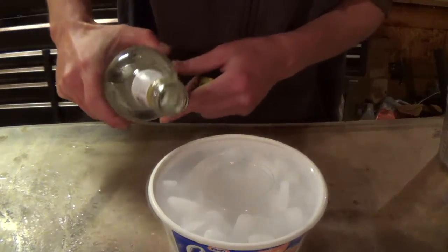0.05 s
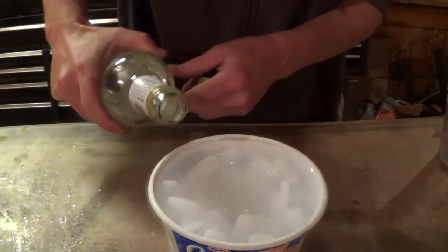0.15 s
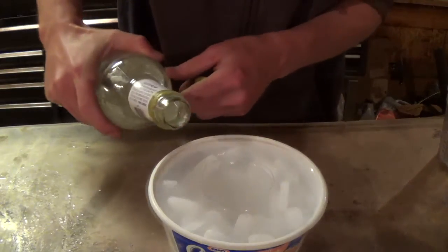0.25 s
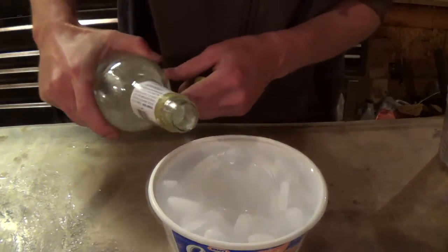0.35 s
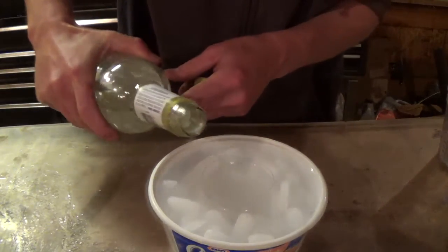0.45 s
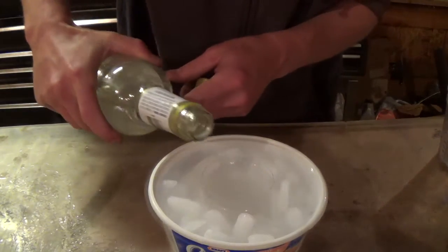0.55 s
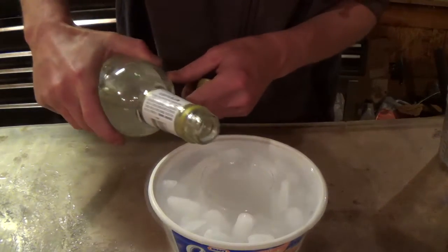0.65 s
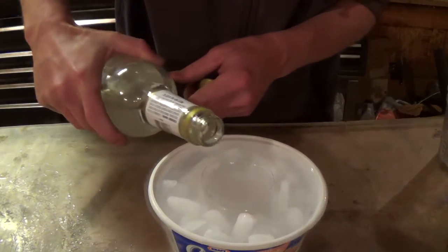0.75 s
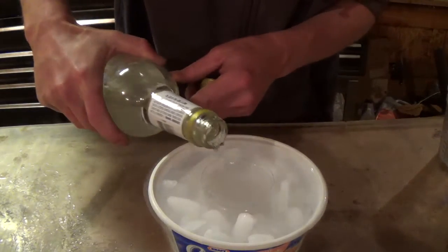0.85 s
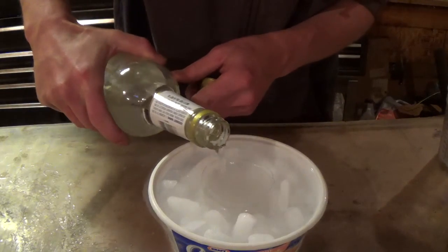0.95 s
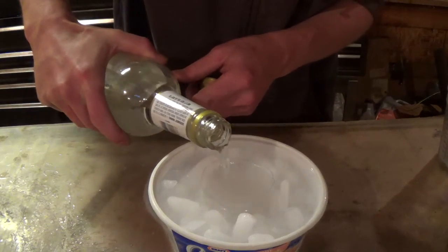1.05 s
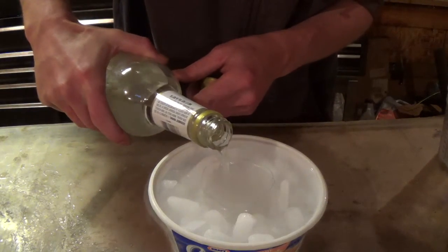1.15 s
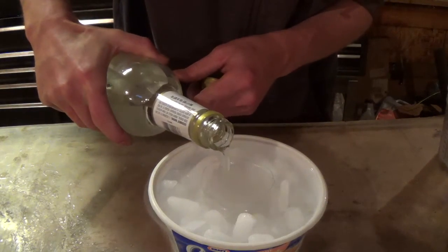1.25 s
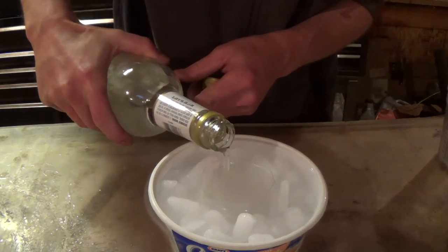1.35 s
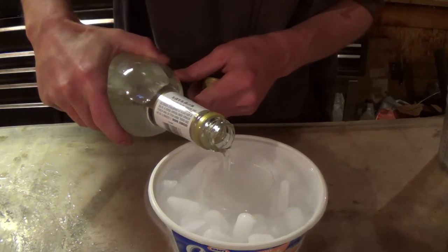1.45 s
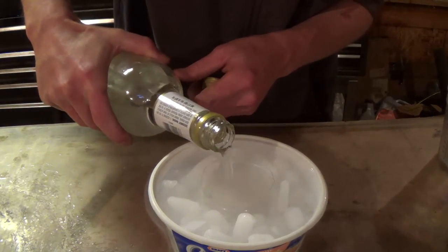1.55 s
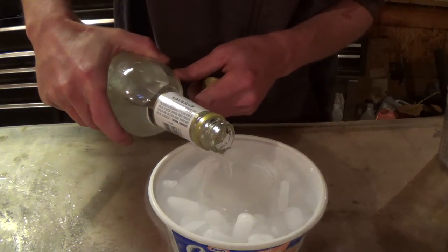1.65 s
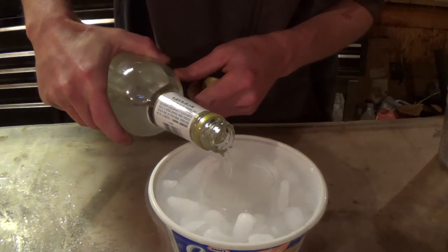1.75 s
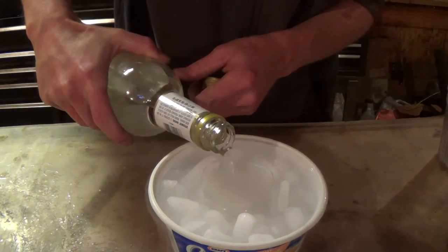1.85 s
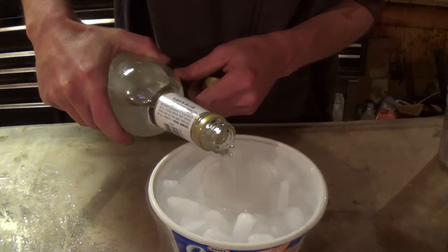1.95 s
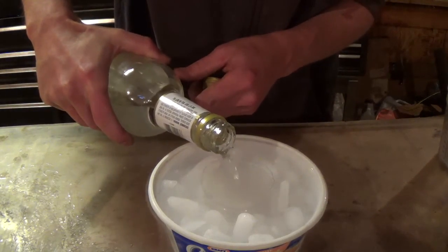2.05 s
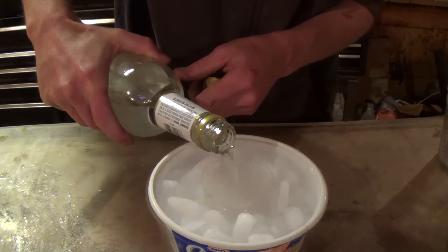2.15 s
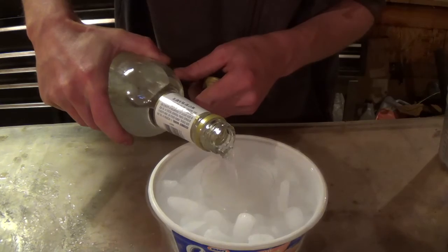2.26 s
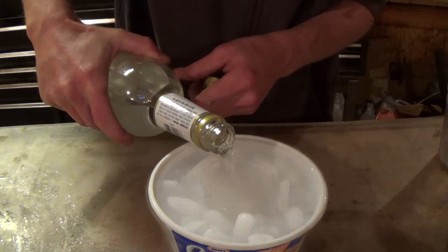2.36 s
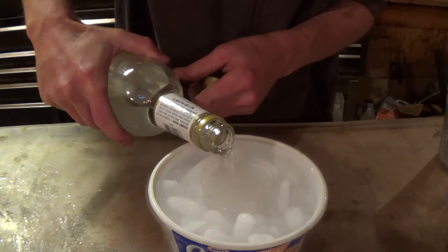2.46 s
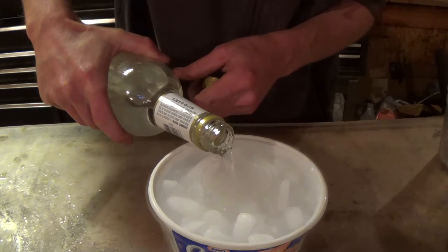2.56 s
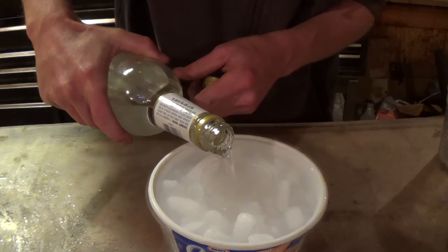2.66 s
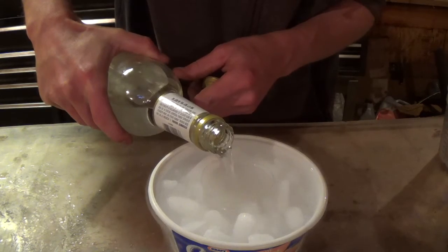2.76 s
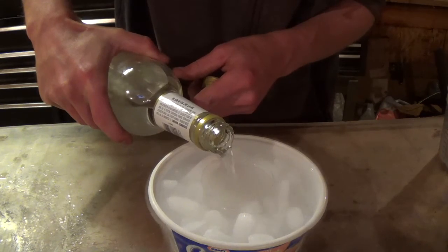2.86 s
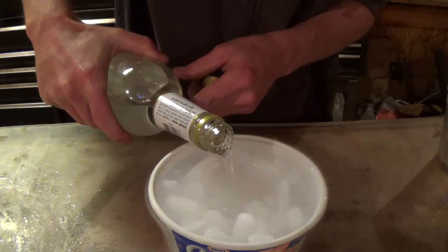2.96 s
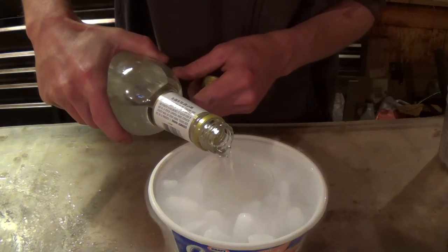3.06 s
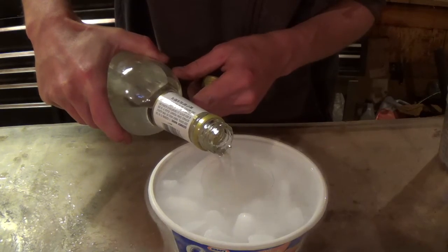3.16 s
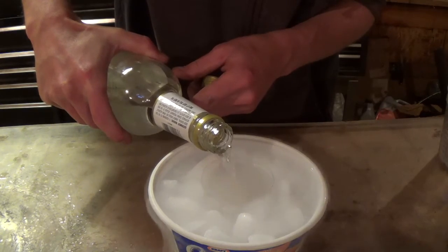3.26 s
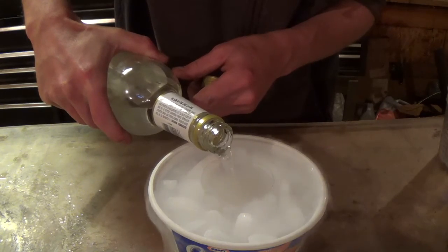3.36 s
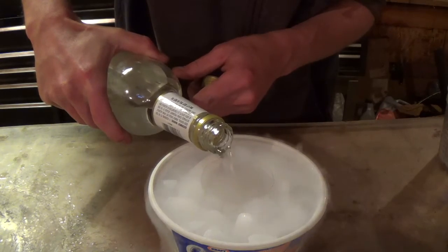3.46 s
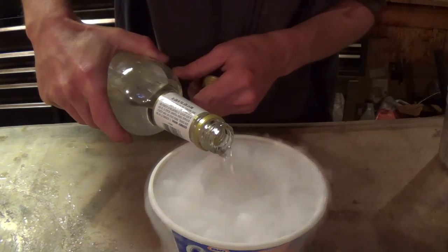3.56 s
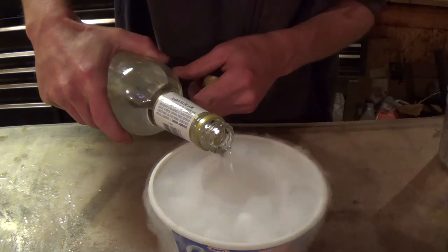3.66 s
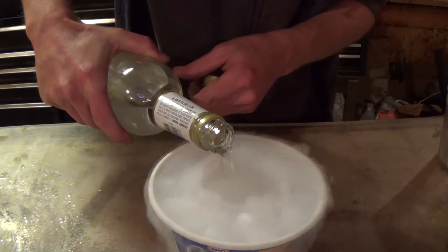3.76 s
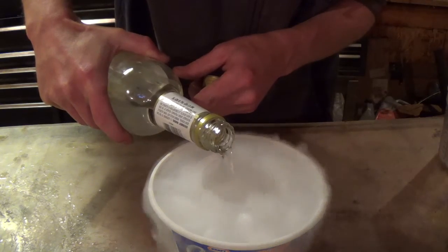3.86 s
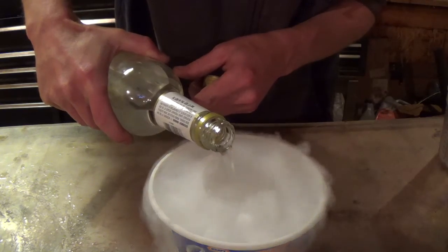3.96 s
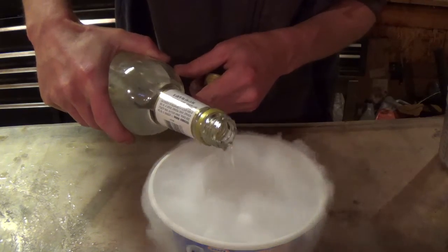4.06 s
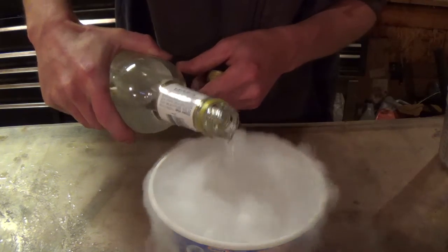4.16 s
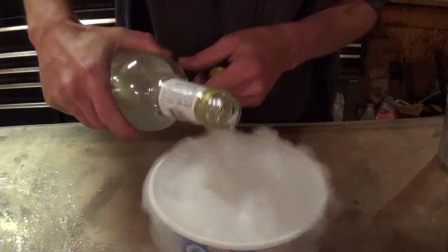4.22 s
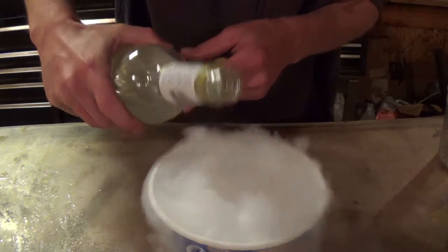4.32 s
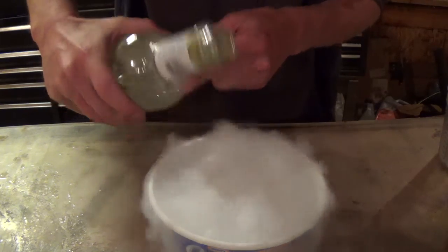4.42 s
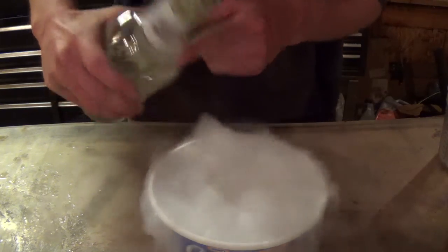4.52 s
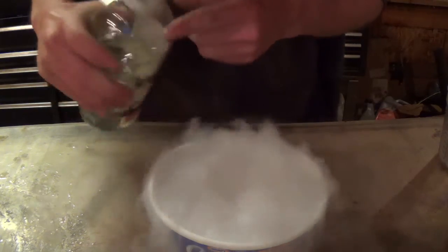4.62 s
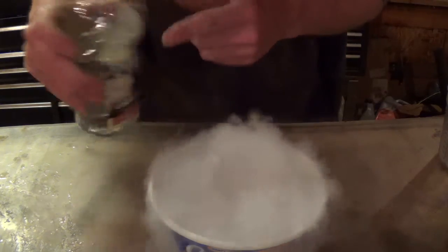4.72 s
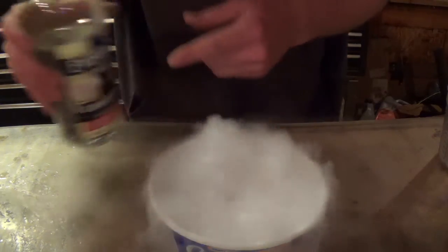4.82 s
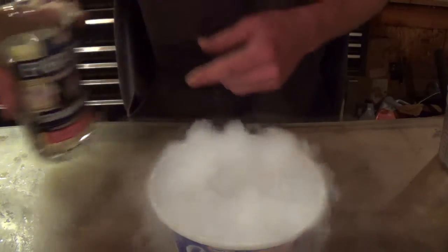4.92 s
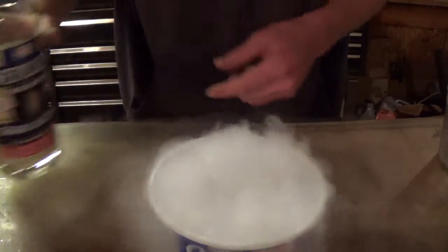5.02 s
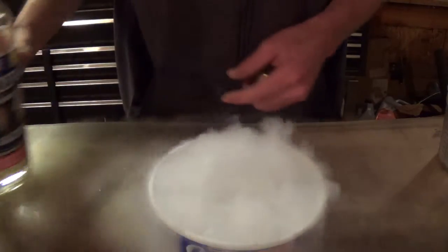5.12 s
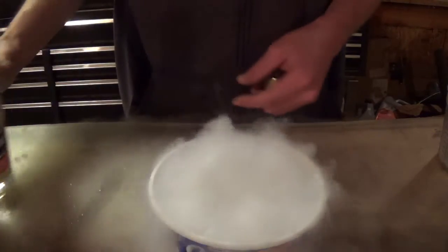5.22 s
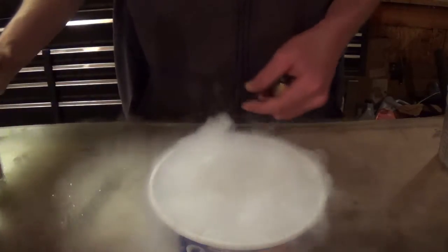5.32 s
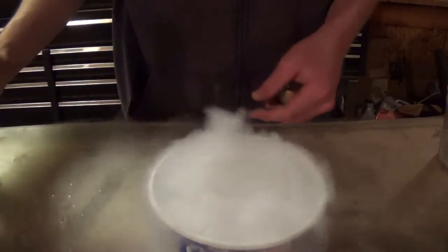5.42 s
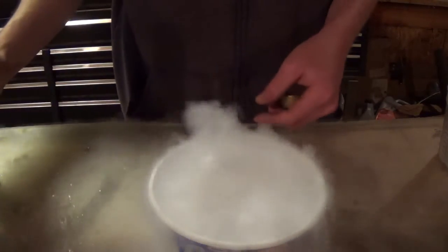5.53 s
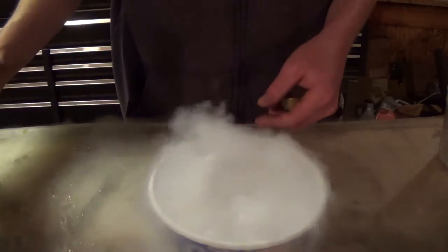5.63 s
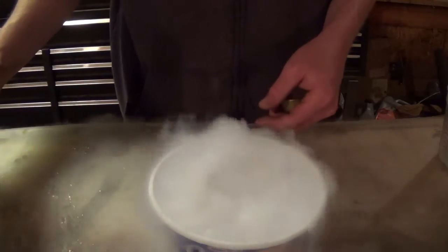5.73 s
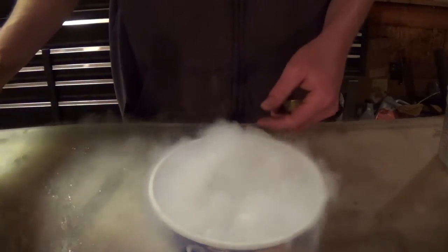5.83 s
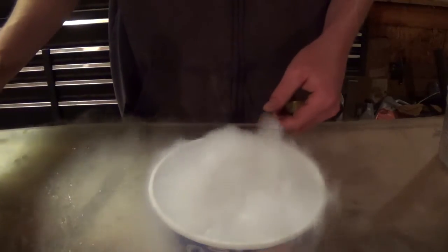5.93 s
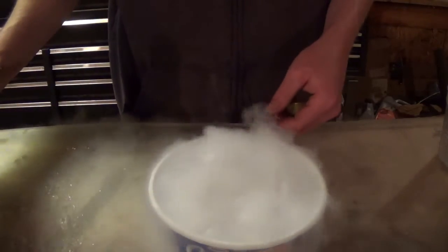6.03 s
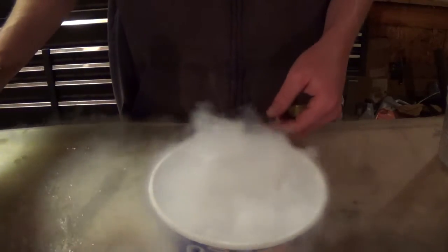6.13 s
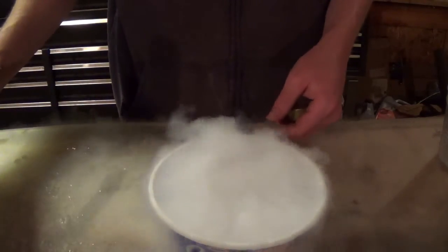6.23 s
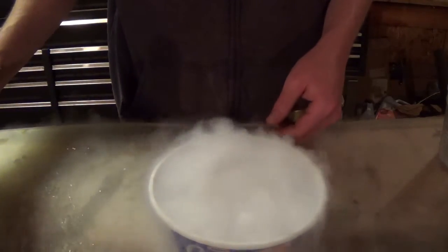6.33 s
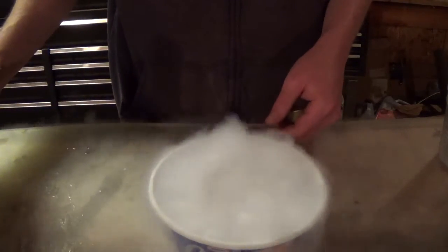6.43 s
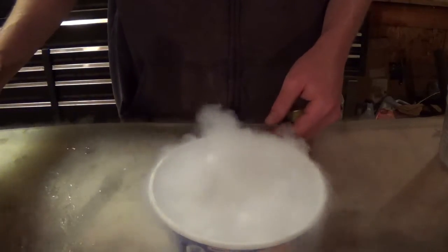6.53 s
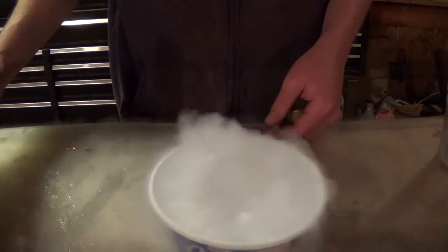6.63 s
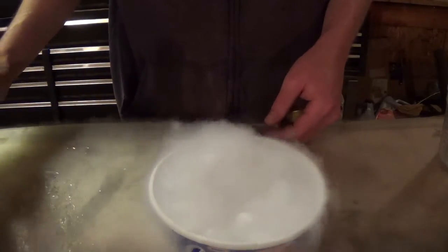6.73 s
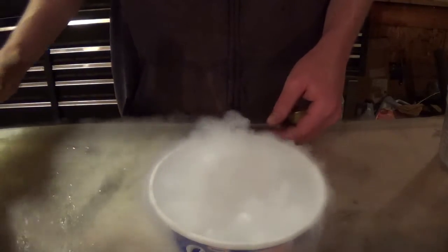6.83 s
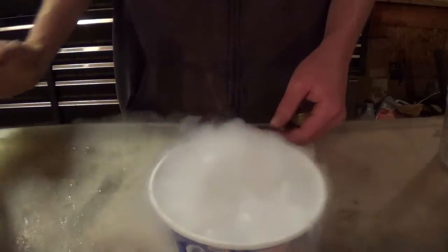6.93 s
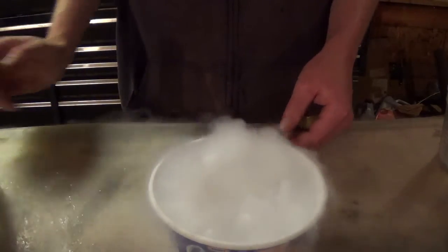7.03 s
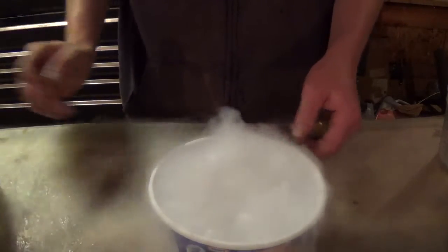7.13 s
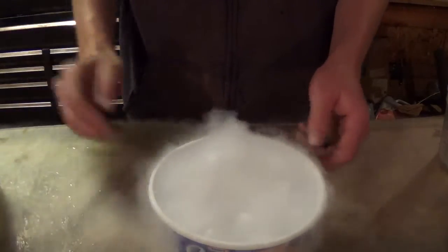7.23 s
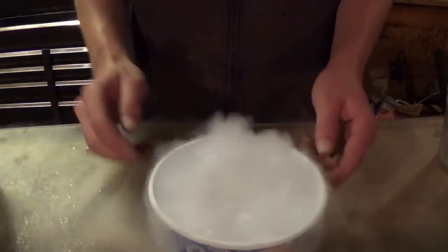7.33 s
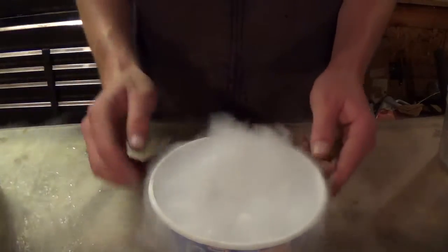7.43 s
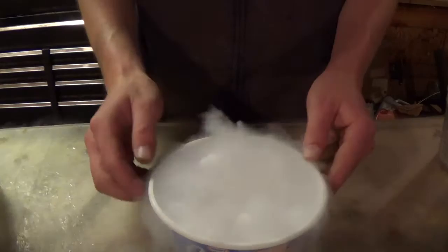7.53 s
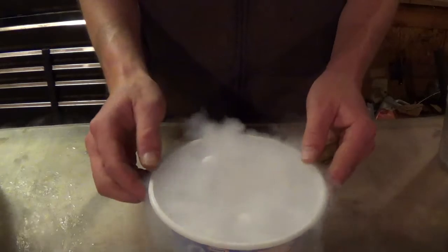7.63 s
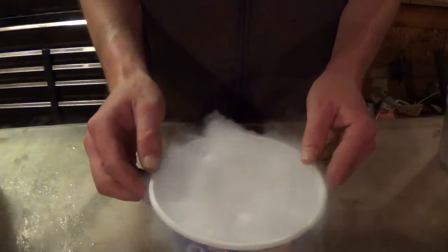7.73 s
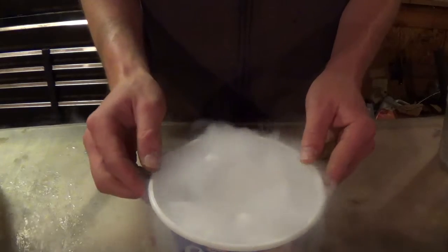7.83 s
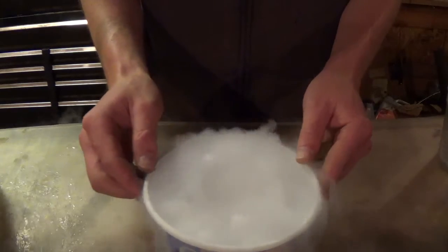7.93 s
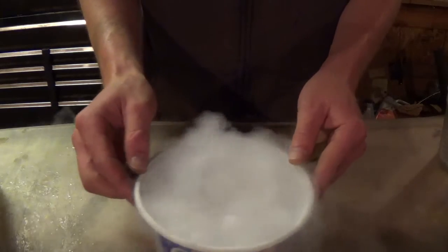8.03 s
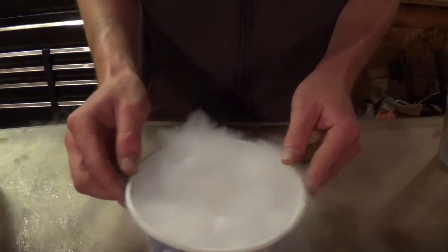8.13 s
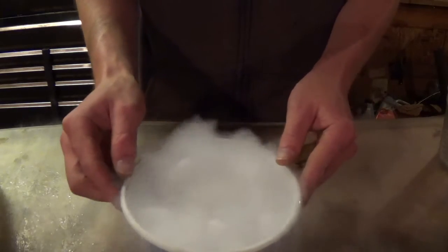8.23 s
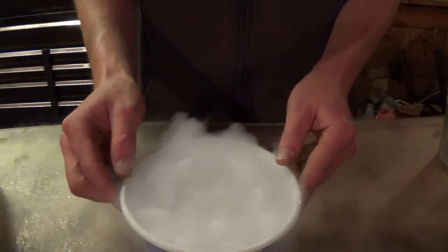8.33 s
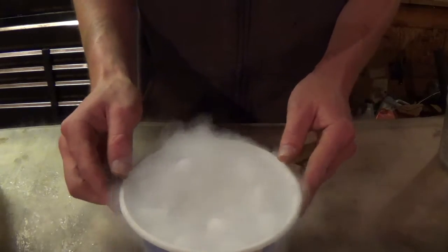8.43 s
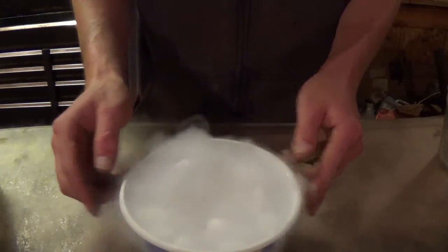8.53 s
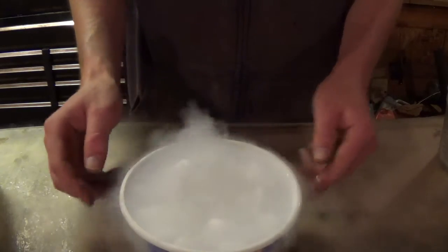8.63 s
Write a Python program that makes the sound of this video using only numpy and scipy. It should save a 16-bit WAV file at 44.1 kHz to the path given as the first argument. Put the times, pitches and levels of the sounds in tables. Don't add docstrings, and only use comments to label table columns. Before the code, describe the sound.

A small stereo microphone sits near a tub of dry ice in a quiet, slightly reverberant workshop. A faint hiss gives way to drips and crackles, then a swelling boil with hollow gurgling and bursting bubbles. The tub is knocked, later the bottle clunks onto the bench and shifts. Full, smooth fizz continues to the end with clicks, scrapes and one bright snap.

```python
import sys
import numpy as np
from scipy import signal
from scipy.fft import rfft, irfft, next_fast_len
from scipy.io import wavfile
from scipy.ndimage import map_coordinates

SR = 44100
rng = np.random.default_rng(int(sys.argv[2]) if len(sys.argv) > 2 else 0)


def level_to_linear(level):
    exponent = np.asarray(level, float) / 20
    return 10 ** exponent


def put_to_file(sound):
    columns = np.atleast_2d(sound).T
    safe = np.clip(columns, -1, 1)
    whole_steps = np.round(safe * 32767)
    wavfile.write(sys.argv[1], SR, whole_steps.astype(np.int16))


N = 382788


def unit(x):
    return x / np.sqrt(np.mean(x ** 2) + 1e-20)


def along(points, hz):
    f, v = np.transpose(points)
    return np.interp(np.log(hz + 1), np.log(f + 1), v)


def wobble(rate):
    knots = rng.standard_normal(int(N * rate / SR) + 4)
    return map_coordinates(knots, [np.arange(N) * rate / SR])


def filtered(x, response):
    m = next_fast_len(x.shape[-1] + 8192)
    spectrum = rfft(x, m) * response(np.fft.rfftfreq(m, 1 / SR))
    return irfft(spectrum, m)[..., :x.shape[-1]]


def resonances(modes):
    def response(f):
        total = 0
        for k, (centre, width, db) in enumerate(modes):
            damping = 1j * f * width
            total = total + (-1) ** k * level_to_linear(db) * damping / (centre * centre - f * f + damping)
        return total
    return response


def sides(pan_db):
    return level_to_linear(np.array([[0.5], [-0.5]]) * pan_db)


def spread(pair, spectrum, alike):
    def mid_side(hz):
        turn = np.arccos(np.clip(along(alike, hz), -1, 1)) / 2
        return level_to_linear(along(spectrum, hz)) * [np.cos(turn), np.sin(turn)]
    mid, side = filtered(pair, mid_side)
    return unit(np.array([mid + side, mid - side]))


def placed(s, grains):
    at = (s * SR).astype(int)[:, None] + np.arange(grains.shape[1])
    return np.bincount(at.ravel(), grains.ravel(), N + SR)[:N]


def ring(s, hz, cycles, gain, rise, swell, size):
    turns = hz[:, None] * np.arange(size) / SR
    life = turns / cycles[:, None]
    envelope = np.exp(-np.log(1000) * life) * (1 - np.exp(-life / swell))
    wave = np.sin(2 * np.pi * turns * (1 + rise * life / 2))
    return placed(s, gain[:, None] * envelope * wave)


def shop():
    # f/Hz, level/dB per Hz
    air_colour = [(15, -38), (25, -17), (53, -2), (86, -12.5), (154, -9), (257, -11.5), (382, -14),
                  (860, -6.5), (965, -5), (1300, -14), (1690, -43), (2860, -120)]
    # f/Hz, level/dB per Hz
    vapour_colour = [(760, -37), (1300, -6), (1600, -4.5), (1840, -7.5), (2190, -4), (3300, -4.5),
                     (5070, -7.5), (7390, -11.5), (8370, -6.5), (11000, -4.5), (14400, -38), (22000, -120)]
    # f/Hz, likeness/1
    room_alike = [(60, 0.96), (130, 0.99), (270, 0.52), (580, 0.54), (1220, 0.47), (2600, 0.67),
                  (5530, 0.63), (11800, 0.98)]
    air = level_to_linear(-58.5) * spread(rng.standard_normal((2, N)), air_colour, room_alike)
    hiss = spread(rng.standard_normal((2, N)), vapour_colour, room_alike)
    return air + level_to_linear(-52.5 + 0.31 * wobble(6)) * hiss


def walls():
    # f/Hz, t60/s
    decay = [(60, 0.29), (400, 0.42), (1500, 0.52), (8000, 0.24)]
    hz, t, z = signal.stft(rng.standard_normal((2, SR // 2)), SR, nperseg=256)
    tail = signal.istft(z * level_to_linear(-60 * t / along(decay, hz)[:, None]), SR, nperseg=256)[1]
    tail = tail + 1.2 * tail.sum(0)
    return np.pad(tail / np.linalg.norm(tail[0]), ((0, 0), (220, 0)))


def rubs():
    # centre t/s, length/s, f/Hz, width/Hz, level/dB
    settle = [
        (5.219, .02, 1100, 1200, -43),
        (5.723, .01, 1700, 700, -33.5),
        (5.736, 0.014, 1400, 650, -35),
        (5.745, 0.013, 677, 120, -29),
        (5.76, 0.01, 169, 90, -30.5),
        (5.74, 0.024, 8900, 3100, -39),
    ]
    # centre t/s, length/s, f/Hz, width/Hz, level/dB
    grips = [(7.975, 0.018, 5800, 6000, -39), (8.065, 0.013, 5600, 5700, -35.5),
             (8.135, 0.022, 8000, 6000, -41), (8.175, .012, 8000, 5000, -41), (8.05, 0.14, 160, 100, -52),
             (1.15, .015, 2400, 3000, -50), (3.4, 0.022, 290, 72, -46), (3.45, .05, 670, 130, -47.5),
             (3.4, .015, 1600, 1200, -41), (2.3, .04, 210, 200, -59), (4.2, 0.11, 970, 500, -50)]
    strokes = [(*row, 4) for row in settle] + [(*row, 1) for row in grips]
    out = np.zeros((2, N + SR))
    t = np.arange(-SR // 4, SR // 4) / SR
    for s, length, hz, width, db, pan_db in strokes:
        roughness = level_to_linear(4.5 * rng.standard_normal(len(t) // 50)).repeat(50)
        grit = rng.standard_normal(len(t)) * roughness
        stroke = np.exp(-(t / length) ** 2)
        grit = stroke * filtered(grit, resonances([(hz, width, 0)]))
        grit = grit * np.linalg.norm(stroke) / np.linalg.norm(grit)
        out[:, round(s * SR) - SR // 4:][:, :len(t)] += sides(pan_db) * level_to_linear(db) * grit
    return out[:, :N] + level_to_linear(-10.0) * signal.fftconvolve(out, walls(), axes=1)[:, :N]


def knocks():
    # t/s, level/dB, contact/ms, boards/dB, room/dB
    blows = [
        (3.3798, -16.5, 0.66, -36, -0.5),
        (3.3922, -18.5, 0.7, -30, -8),
        (5.2489, -7.5, 0.46, 0.5, -4.5),
        (5.2523, -13, 0.54, -23, -13),
        (5.269, -25.5, 1.4, 2, -9),
        (5.6266, -27, 0.47, 1, -6),
        (5.757, -28, 0.92, -1, -8.5),
        (8.2331, -29.5, 1.24, 5.5, -10.5),
        (8.2435, -37, 3.8, -3, -15),
    ]
    # f/Hz, width/Hz, level/dB
    hollow_modes = [(630, 90, 1.6), (385, 160, -12), (1000, 210, -23), (1490, 280, -27), (2050, 600, -8)]
    # f/Hz, width/Hz, level/dB
    board_modes = [(67.4, 18, 4.5), (143, 26, 0), (220, 9.7, 8), (284.4, 15, 0.5), (394, 82, -3)]
    out = np.zeros((2, N + SR))
    t = np.arange(SR // 2) / SR
    for s, db, contact_ms, boards_db, room_db in blows:
        is_bottle = 5.2 <= s < 5.3
        if is_bottle:
            pan_db = 4
        else:
            pan_db = -3 if s < 5.2 else 2
        push = -level_to_linear(db) * np.sin(np.pi * np.minimum(t * 1000 / contact_ms, 1))
        slap = filtered(push, lambda f: (1j * f / (230 + 1j * f)) ** 3)
        hollow = 3.17 * filtered(slap, resonances(hollow_modes))
        boards = level_to_linear(boards_db + 6) * (filtered(push, resonances(board_modes)) + 0.15 * push)
        source = 0.57 * hollow + boards + 1.14 * slap
        wet = signal.fftconvolve(source[None], walls(), axes=1)[:, :len(t)]
        wet = filtered(wet, lambda f: 1 / (1 + 1j * f / 1300))
        near = hollow + 0.43 * slap
        lag = 3 if is_bottle else 0
        near = np.array([near, np.roll(near, lag)])
        out[:, round(s * SR):][:, :len(t)] += sides(pan_db) * near + boards + level_to_linear(room_db) * wet
    return out[:, :N]


def rattled(x, echo_db, t60):
    t = np.arange(SR // 20) / SR
    echo = rng.standard_normal(len(t)) + 0.52 * rng.standard_normal((2, len(t)))
    echo = echo * level_to_linear(-60 * t / t60)
    return x + level_to_linear(echo_db) * signal.fftconvolve(x[None], echo / np.linalg.norm(echo[0]), axes=1)[:, :N]


def spray(count):
    when, pitch, size = rng.random((count, 3)).T
    return np.transpose([0.15 + 2.95 * when, -46 + 7 * (size - 0.5), 2000 * 5 ** pitch])


def cracks(s, hz, crack_db):
    # f/Hz, width/Hz, level/dB
    tub_modes = [(910, 90, 3), (2350, 1300, -0.5), (5230, 1700, -1.5), (9700, 2500, 0)]
    t = np.arange(700) / SR
    fade = level_to_linear(-60 * t / 0.0079) * (1 - np.exp(-t / 0.00044))
    away = np.log2((np.fft.rfftfreq(len(t), 1 / SR) + 50) / hz[:, None]) / 1.3
    noise = irfft(rfft(rng.standard_normal((len(s), len(t)))) / (1 + away ** 4), len(t))
    grains = noise * level_to_linear(crack_db + 18)[:, None] * fade
    return filtered(placed(s - 0.0005, grains), resonances(tub_modes))


def pops():
    # t/s, level/dB, bubble f/Hz
    splashes = [(0.9472, -41, 9060), (0.9555, -40, 2500), (0.9641, -39, 10440), (1.0588, -44, 4410),
                (1.0663, -30, 10300), (1.083, -44, 730), (1.0891, -39, 2470), (1.0956, -41, 1540),
                (1.0965, -36, 2700), (1.0987, -40.5, 890), (1.1361, -36, 5390), (1.144, -31, 2300),
                (1.155, -28, 2620), (1.1597, -39.5, 1000), (1.161, -35, 5560), (1.2199, -26, 5170),
                (1.2351, -34, 2740), (1.2696, -38, 9940), (1.309, -41, 7500), (1.368, -42, 5500)]
    # t/s, level/dB, bubble f/Hz
    drops = [(1.6281, -38, 10680), (1.7293, -41.5, 905), (1.7443, -35, 4620), (1.7916, -39.5, 910),
             (1.8309, -34, 5660), (1.9122, -34, 10550), (1.9258, -23, 8970), (1.9458, -37, 9750),
             (2.1223, -33.5, 3220), (2.131, -35.5, 5460), (2.1568, -32, 9090), (2.1714, -37, 9280),
             (2.351, -37, 3000), (2.4002, -34, 4530), (2.4427, -29, 9910), (2.455, -22.5, 10350),
             (2.6352, -36, 5440), (2.654, -39, 8760), (2.662, -39, 2200), (2.7552, -33, 5640),
             (2.8066, -34, 6320), (2.973, -36, 2910)]
    # t/s, level/dB, bubble f/Hz
    bursts = [(3.3857, -33.5, 5270), (3.9122, -31, 4890), (3.9673, -29, 2840), (3.9695, -31, 2840),
              (4.0532, -25.5, 2750), (4.0535, -33.5, 975), (4.186, -30, 1200), (4.216, -31.5, 1450),
              (4.217, -25.5, 9640), (4.251, -23.5, 9140), (4.2622, -28, 5290), (4.2802, -31, 1410),
              (4.336, -34.5, 1530), (4.8523, -31, 4550), (4.8595, -26.5, 4850), (6.5712, -34, 1460),
              (6.5776, -31, 1340), (6.578, -31, 9350), (8.4185, -18.5, 4980), (8.4303, -36, 1500)]
    # t/s, level/dB, f/Hz
    jolts = [(5.627, -29, 1940), (5.7144, -24, 9900), (5.7146, -24, 7870), (5.7147, -27, 3800),
             (5.715, -20.5, 1810), (5.7422, -29.5, 9630), (7.9696, -36, 5210), (7.9796, -31, 3720),
             (7.9797, -31, 10100), (8.0048, -31.5, 5270), (8.061, -25, 5900), (8.0612, -30, 3800),
             (8.0653, -33, 3710), (8.132, -35, 9800), (8.1433, -34, 5650), (8.1724, -33, 7690),
             (8.4188, -22, 2270), (8.418, -28.5, 8800), (8.418, -30, 3600)]
    # t/s, level/dB, f/Hz
    snaps = [(0.3578, -33, 4900), (1.0954, -31, 4520), (1.106, -36, 5740), (1.133, -38, 6500),
             (1.1509, -30, 3400), (1.159, -28.5, 3750), (1.7273, -29, 3740), (1.79, -32, 5160),
             (2.0574, -36, 5230), (2.3659, -32.5, 6160), (2.4544, -35, 3290)]
    base_db = (-46, -45.5, -47, -38, -38)
    growth = (0.37, 0.39, .3, 1.1, 0.41)
    kinds = [np.array(splashes), np.vstack([drops, spray(count=30)]), np.array(bursts),
             np.array(jolts), np.array(snaps)]
    s, db, hz = np.vstack(kinds).T
    crack_db = np.concatenate([base + grows * (rows[:, 1] + 32)
                               for rows, base, grows in zip(kinds, base_db, growth)])
    cycles = 1.51 * (5 + 0.0023 * hz)
    bubbles = ring(s - 0.0004, hz, cycles, level_to_linear(db + 9.5), 0.042, 0.11, size=900)
    film = ring(s - 0.0004, hz, np.full(len(s), 3.5), level_to_linear(db + 5), 0, 0.078, size=300)
    near = rattled(bubbles + film, echo_db=-6, t60=0.011) + cracks(s, hz, crack_db) * sides(-0.44)
    return near + level_to_linear(-15.0) * signal.fftconvolve(near, walls(), axes=1)[:, :N]


def swarm(lo_hz, hi_hz, cycles, scatter_db, apart, count, size):
    when, pitch, life, strength = rng.random((count, 4)).T
    hz = lo_hz * (hi_hz / lo_hz) ** pitch
    gain = level_to_linear(-scatter_db * np.log(1 - 0.985 * strength)) * hz
    bubbles = unit(ring(when * N / SR, hz, cycles * (0.5 + life), gain, 0.2, 0.081, size))
    bed = unit(filtered(rng.standard_normal((2, N)), lambda f: (f > lo_hz / 4) & (f < hi_hz)))
    return np.array([np.sqrt(apart) * bubbles + np.sqrt(1 - apart) * bed[0], bed[1]])


def boil():
    # t/s, level/dB
    strength = [(0.0, -51.5), (0.89, -53.5), (1.16, -49), (1.5, -52), (2.0, -48.5), (2.64, -46),
                (3.24, -42.5), (3.53, -41), (4.45, -37.5), (4.98, -38), (6.28, -39), (6.6, -38.5),
                (7.2, -39.5), (7.81, -39.5), (8.1, -38.5), (8.68, -40.5)]
    # f/Hz, level/dB per Hz
    fizz_colour = [(820, -37), (1400, -9.5), (1540, -6), (1800, -3.5), (2230, -0.5), (2680, -1),
                   (3820, -6.5), (5160, -1.5), (7360, -12.5), (9960, -5), (10600, -7.5), (11000, -7.5),
                   (14400, -41), (22000, -120)]
    # f/Hz, level/dB per Hz
    gurgle_colour = [(29, -44), (50, -12), (183, -10.5), (316, -6.5), (356, -7), (444, -3), (546, -4),
                     (633, 1.5), (766, -2.5), (901, 0.5), (999, -7), (1230, -3.5), (1340, -8), (1700, -4.5),
                     (2210, -37), (3740, -120)]
    # f/Hz, likeness/1
    tub_alike = [(60, 0.96), (130, 0.97), (270, 0.88), (580, 0.96), (1220, 0.89), (2600, 0.94),
                 (5530, 0.92), (11800, 0.93)]
    # f/Hz, width/Hz, level/dB
    mouth_mode = (689, 74, 0)
    t = np.arange(N) / SR
    fizz_db = np.interp(t, *np.transpose(strength))
    over_db = fizz_db + 38
    gurgle_db = -46 + 1.18 * over_db
    bright_db = 0.05 - 0.063 * over_db
    fog_db = np.clip(6.5 * (t - 4.1), 0, 16)
    mouth_db = -51 + 1.35 * over_db - fog_db
    surge = 0.35 * wobble(9) + 0.3 * wobble(35)
    apart = np.interp(fizz_db, [-46, -40], [0.55, 0.22])

    fizz = spread(swarm(900, 12000, 9, 2.2, apart, count=30000, size=128), fizz_colour, tub_alike)
    top = filtered(fizz, lambda hz: np.log2((hz + 500) / 4500))
    fizz = fizz + (level_to_linear(bright_db) - 1) * top

    gurgle = spread(swarm(150, 1800, 8, 2.2, 0.7 * apart, count=5000, size=640), gurgle_colour, tub_alike)
    deep = filtered(gurgle, lambda hz: 1 / (1 + (hz / 520) ** 6))
    shallow_db = np.interp(t, [3.7, 4.9], [-5, 0])
    gurgle = gurgle + (level_to_linear(shallow_db) - 1) * deep

    note = resonances([mouth_mode])
    mouth = unit(filtered(gurgle, lambda hz: note(hz) ** 2))
    bubbling = level_to_linear(fizz_db - 0.63 + surge) * fizz + level_to_linear(gurgle_db - 1.0 + surge) * gurgle
    return bubbling + level_to_linear(mouth_db - 9) * mouth


def scene():
    return shop() + rubs() + knocks() + pops() + boil()


def roll_off(x):
    return signal.sosfilt(signal.butter(12, 12350, fs=SR, output="sos"), x)


def record(dry):
    # f/Hz, left minus right/dB
    lean = [(60, -0.5), (220, 0.0), (840, 0.5), (3140, 0.0), (11800, -1.0)]

    def microphone(hz):
        low_cut = 1j * hz / (37 + 1j * hz)
        top_cut = level_to_linear(-np.clip((hz - 11000) / 2, 0, 62))
        return sides(along(lean, hz)) * low_cut * top_cut
    return roll_off(filtered(dry, microphone))


dry = scene()
out = record(dry)
put_to_file(out)
```